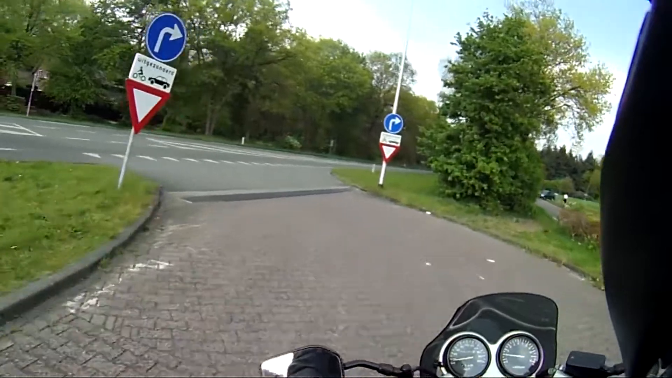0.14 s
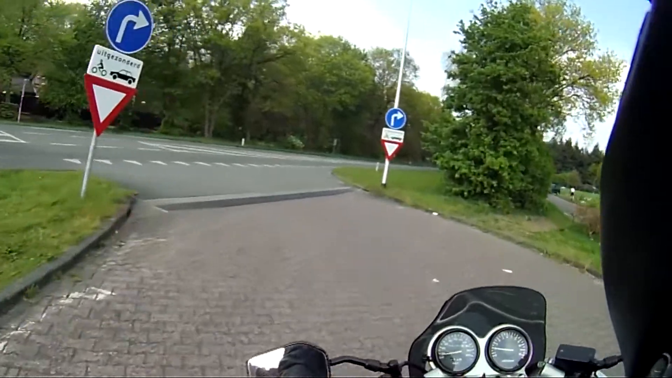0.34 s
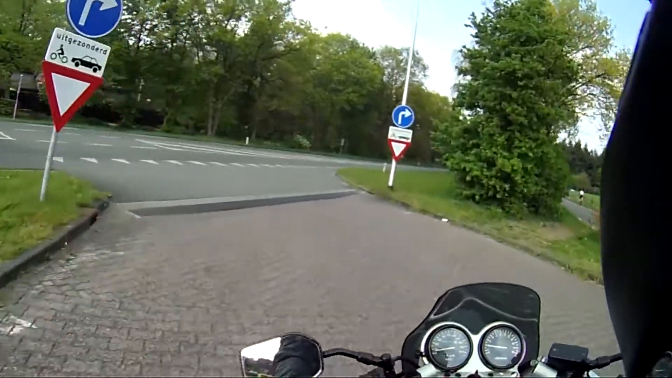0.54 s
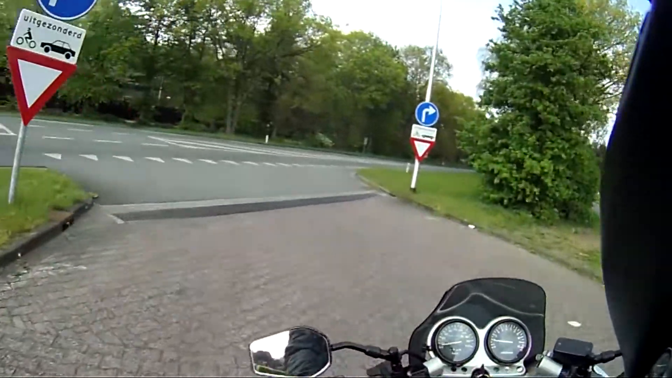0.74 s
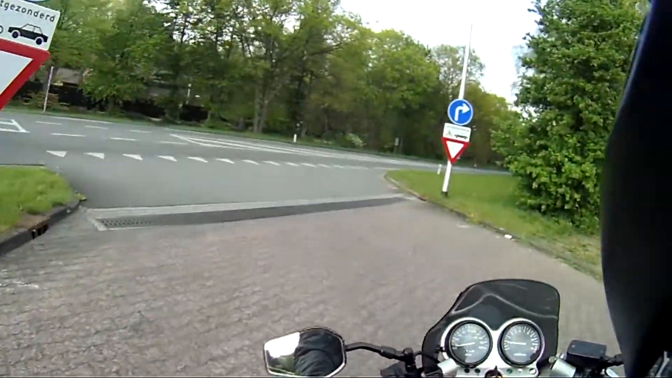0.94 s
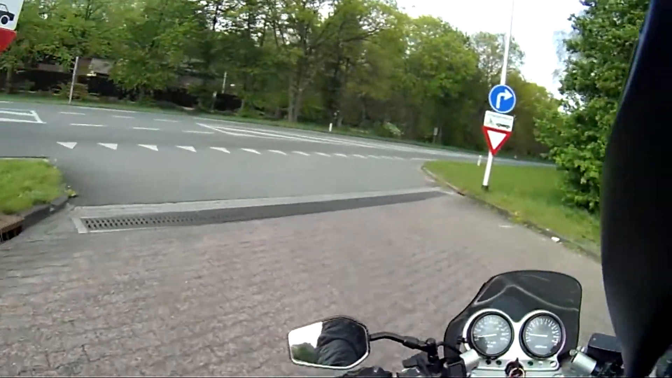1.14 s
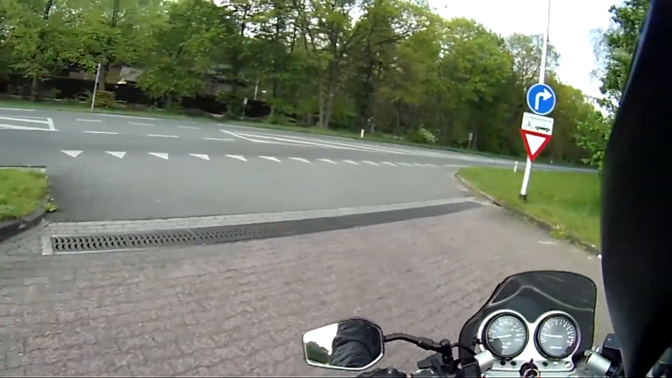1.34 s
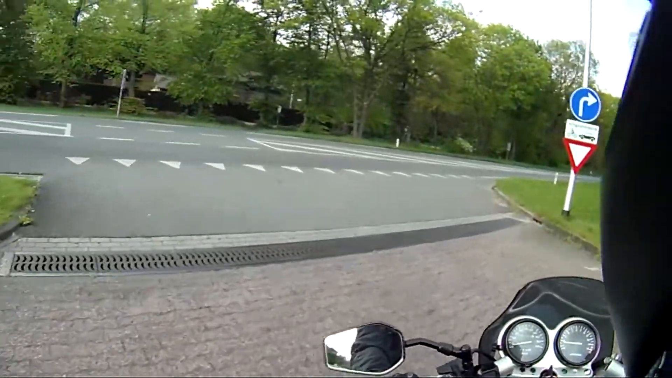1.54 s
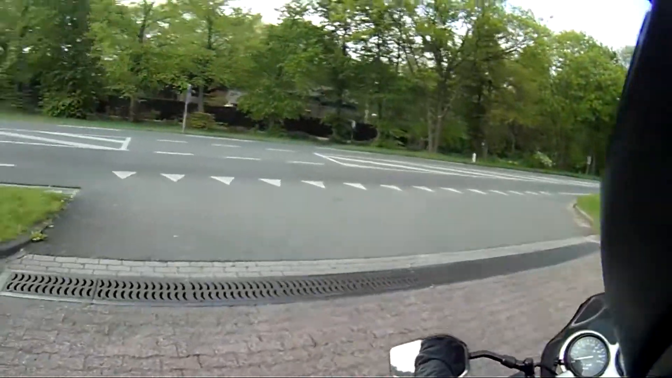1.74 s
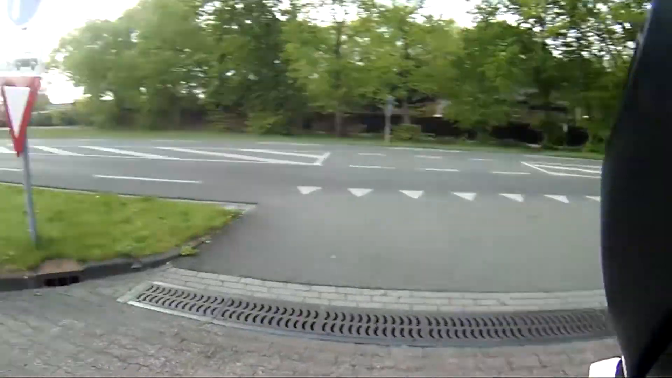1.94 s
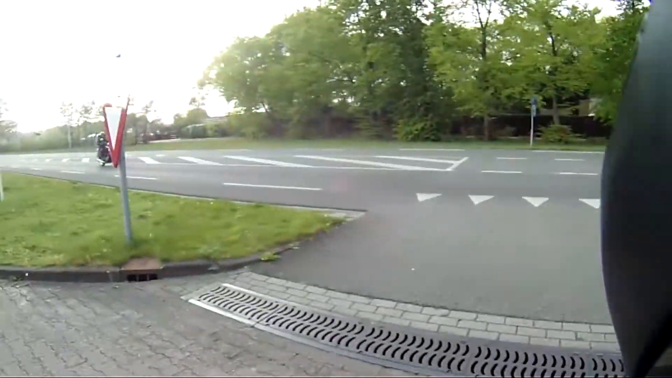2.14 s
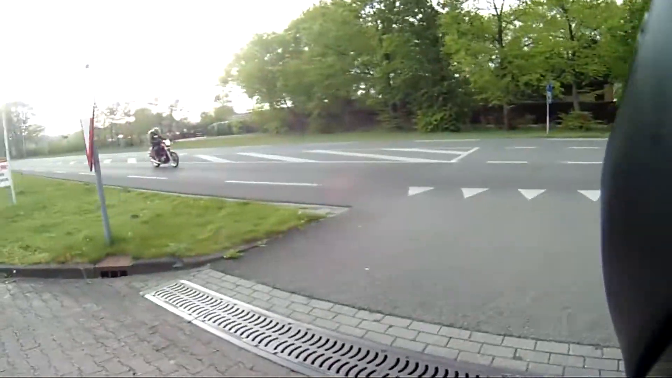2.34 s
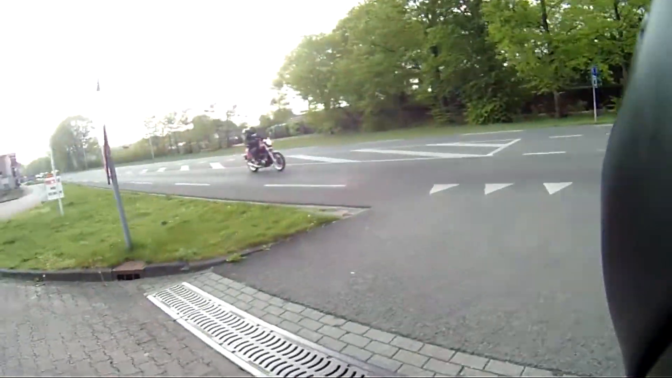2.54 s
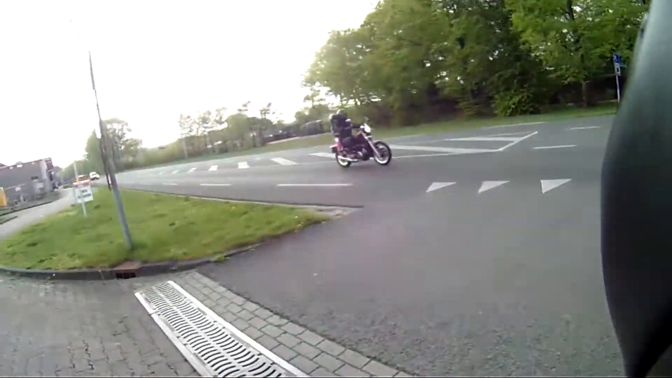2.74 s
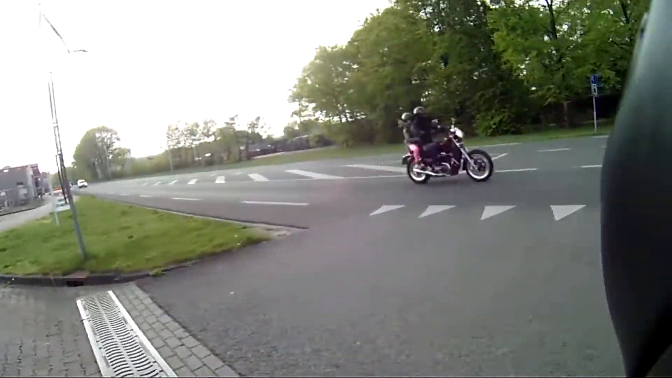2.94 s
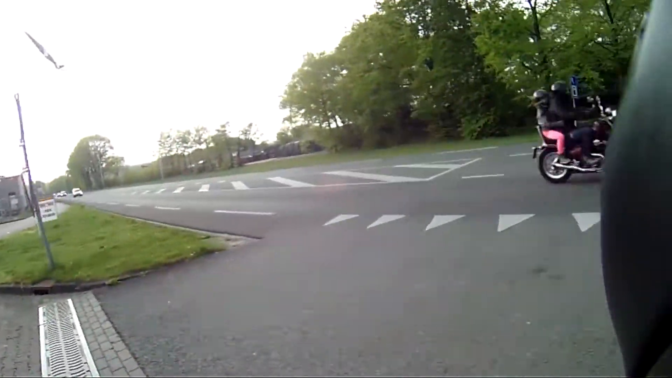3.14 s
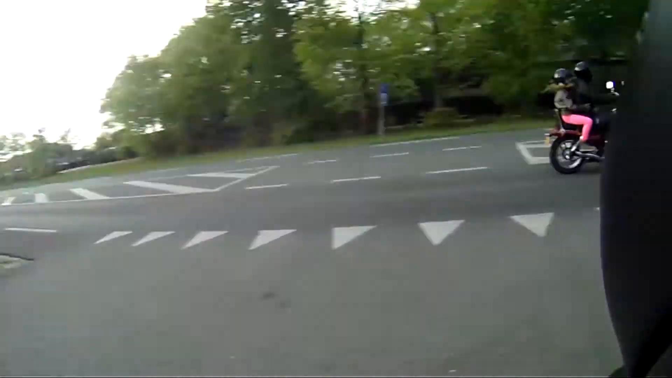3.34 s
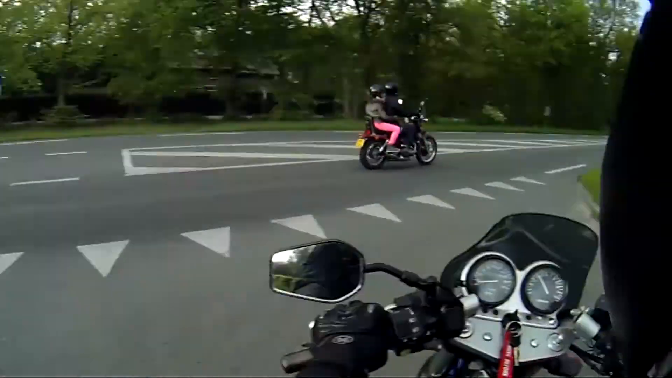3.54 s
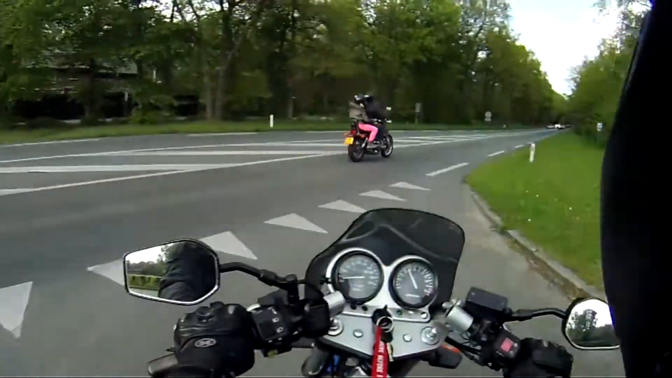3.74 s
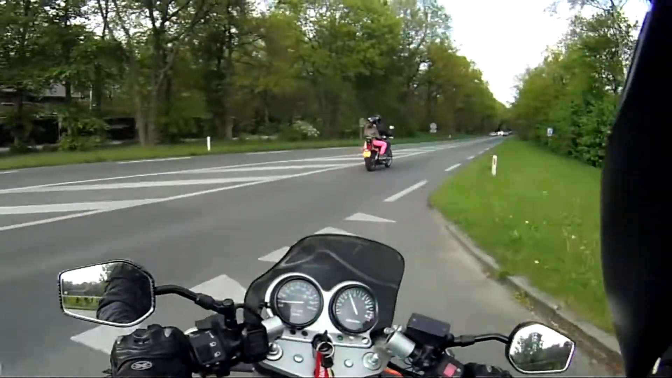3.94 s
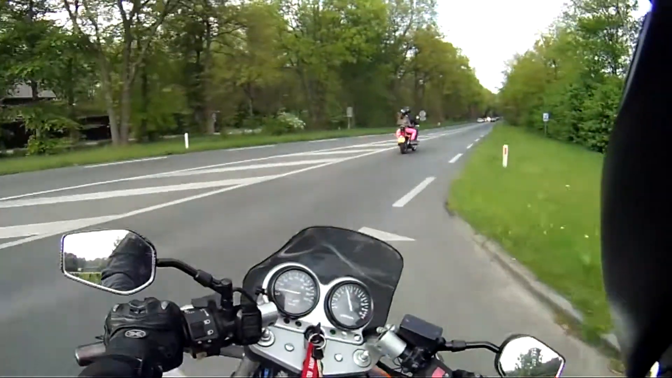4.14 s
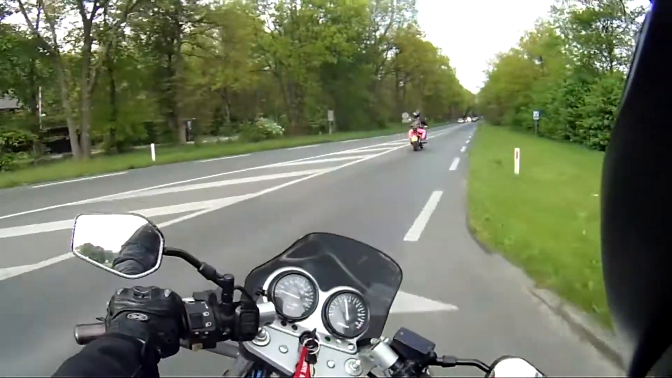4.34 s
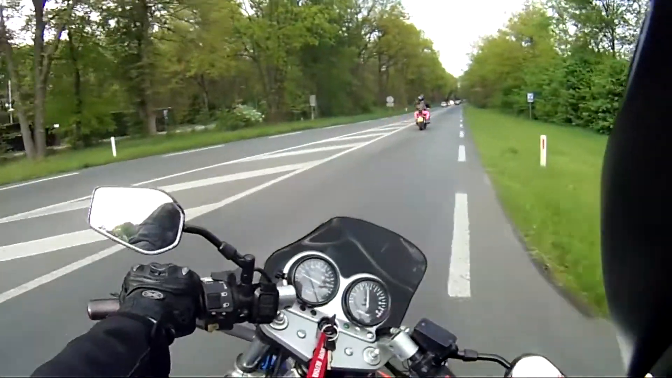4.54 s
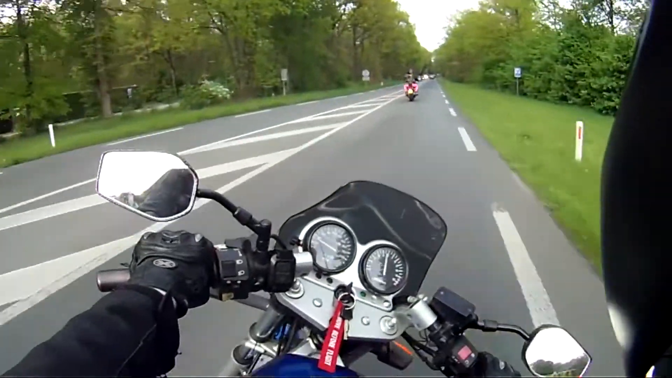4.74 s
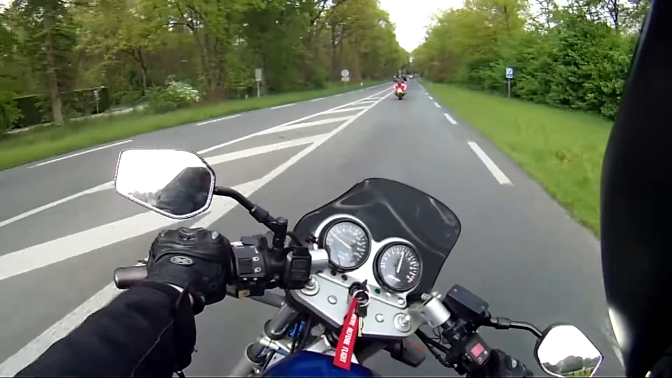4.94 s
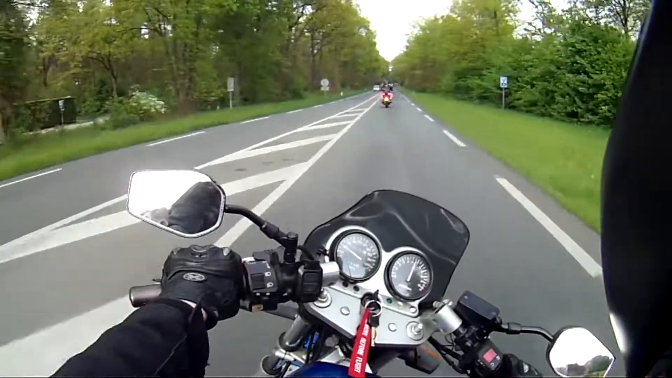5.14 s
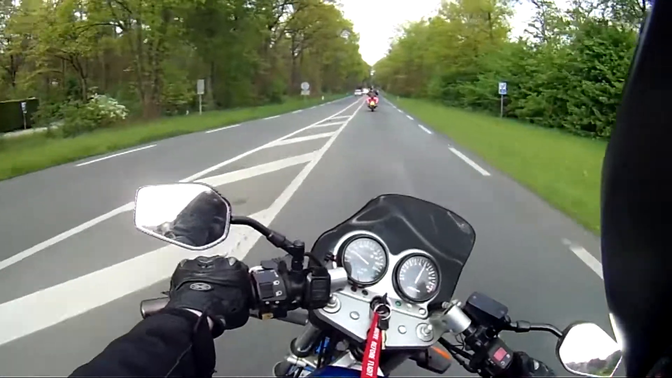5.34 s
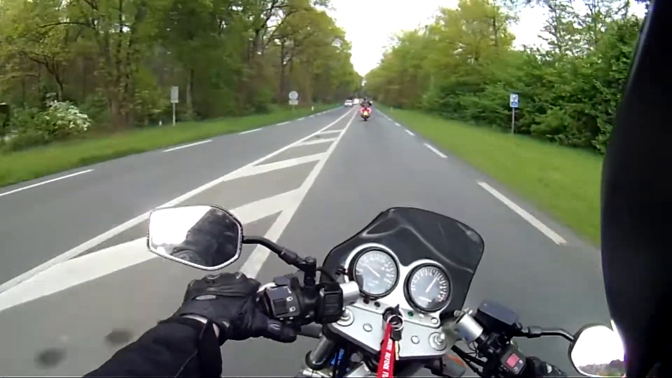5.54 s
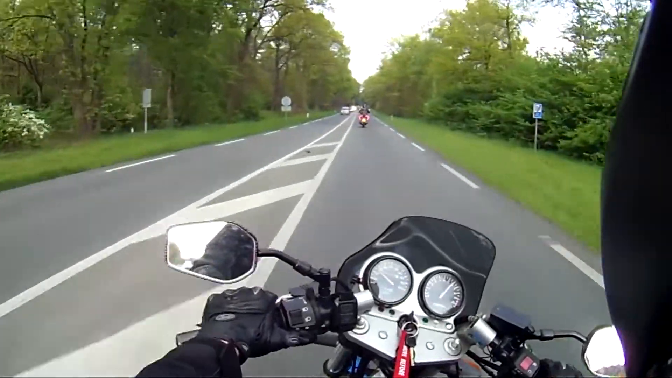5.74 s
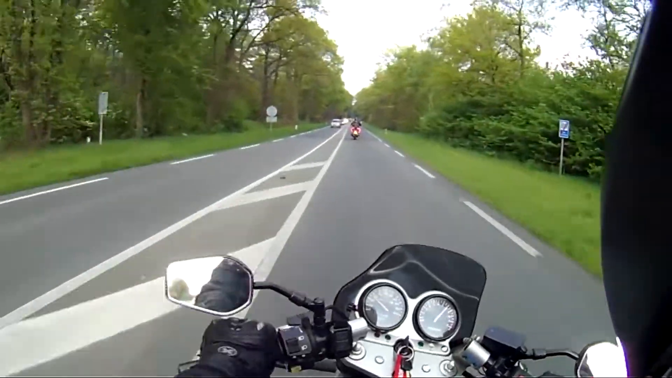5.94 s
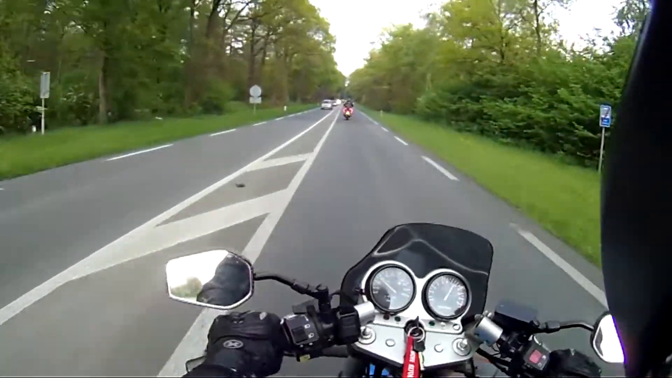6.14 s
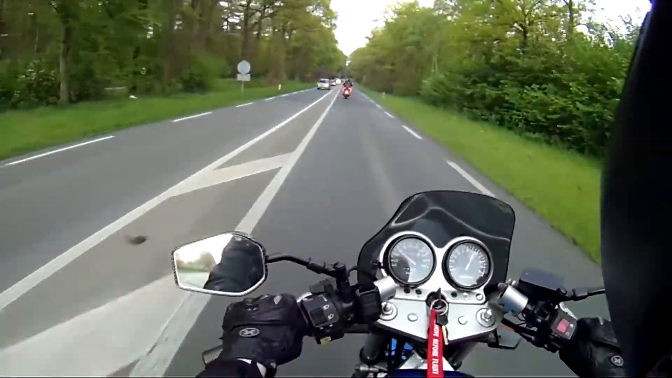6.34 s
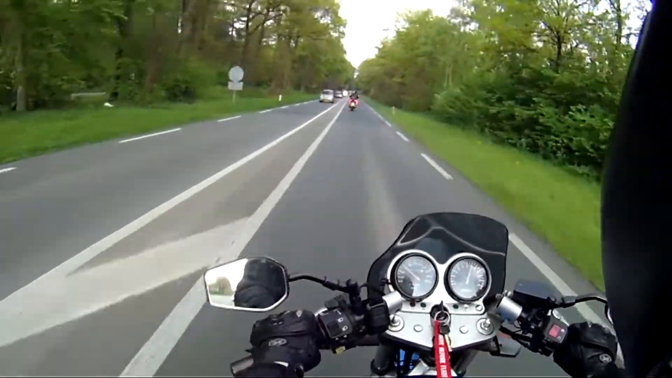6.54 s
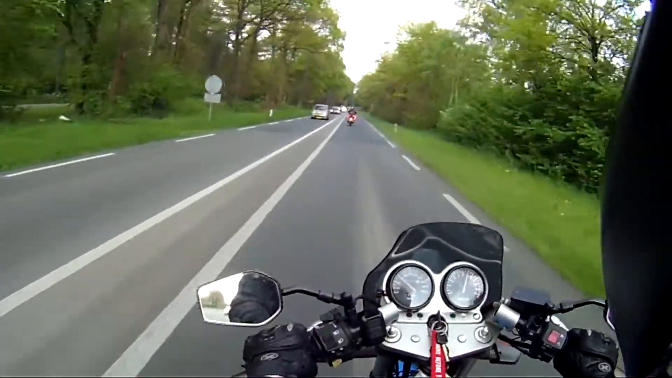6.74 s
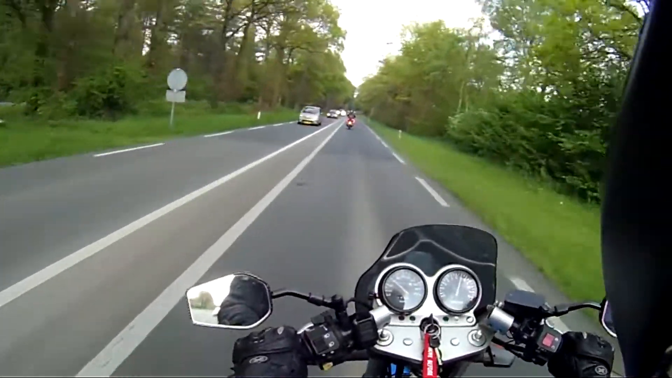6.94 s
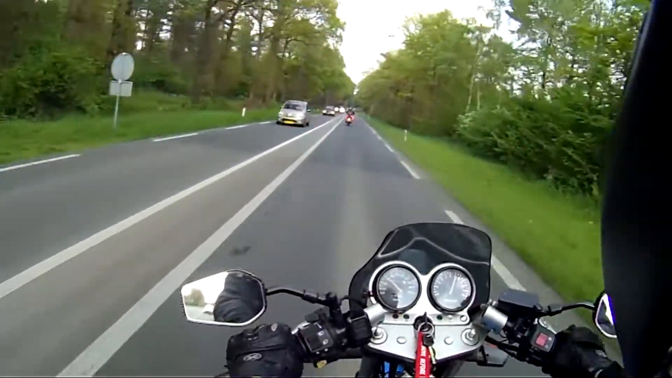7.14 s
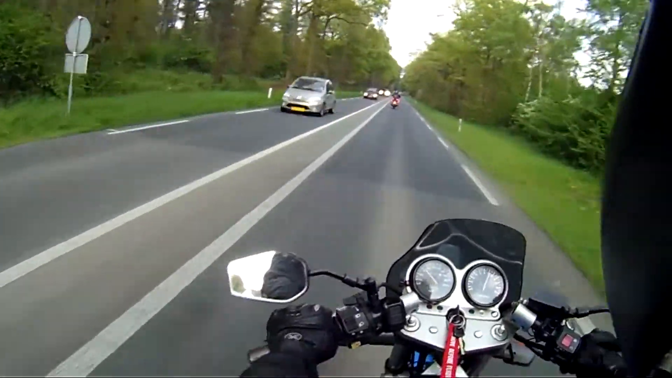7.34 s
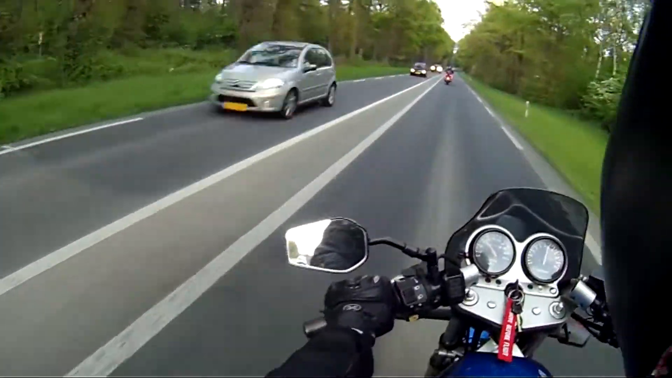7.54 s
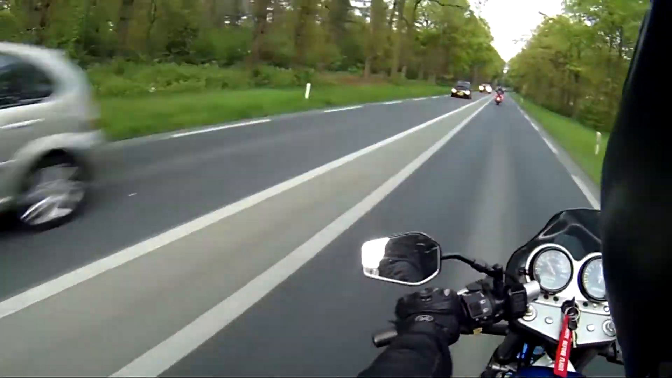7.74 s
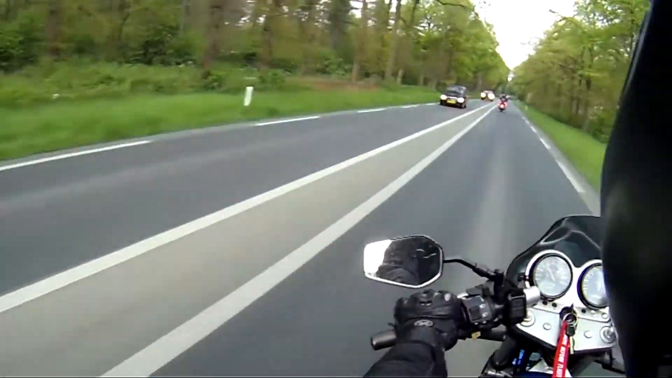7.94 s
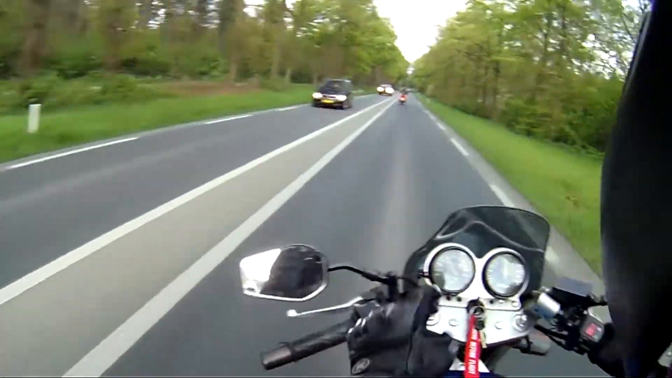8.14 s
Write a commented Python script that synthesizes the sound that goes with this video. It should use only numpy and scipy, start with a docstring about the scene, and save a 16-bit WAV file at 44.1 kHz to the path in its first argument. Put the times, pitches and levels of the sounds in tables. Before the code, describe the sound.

Heard at the rider's helmet, a twin-cylinder motorcycle idles slowly over block paving, with faint birdsong, small lever knocks and a brief collar rustle. It then accelerates onto the open road while another bike passes with a soft tyre hiss. The engine grows loud and raspy over gear whine, chain sizzle and mounting wind. The revs drop at a gear change, climb again and drop once more, and an oncoming car rushes quickly by.

```python
"""A two-cylinder motorcycle, heard from the rider's helmet, idles up to a junction and pulls away.
Its cylinders gulp air about a quarter of a cycle apart; the note hardens as the throttle opens and
turns hollow at the gear changes. Valves clatter, gears whine, the chain sizzles, levers knock, and
wind buffets the helmet as speed builds. Tyres hiss as another bike passes, and later an oncoming car.
Before the junction a bird sings faintly, the tyres rumble on paving and the helmet rubs the collar."""
import sys
import numpy as np
from scipy import signal
from scipy.fft import rfft, irfft, next_fast_len
from scipy.io import wavfile

SR = 44100
rng = np.random.default_rng(int(sys.argv[2]) if len(sys.argv) > 2 else 0)


def wrap_up_sound(samples):
    """Save the sound to the file named by the first command line argument, as 16-bit audio."""
    columns = np.atleast_2d(samples).T
    # keep every value between -1 and 1, then stretch to whole-number steps
    tamed = np.clip(columns, -1, 1)
    steps = np.round(tamed * 32767).astype(np.int16)
    wavfile.write(sys.argv[1], SR, steps)


N = 366024
TIME = np.arange(N) / SR
PULL_AWAY_S, PULL_AWAY_FADE_S = 3.055, 0.024
CRUISE_REVS, CRUISE_KMH = 50, 60

# Engine speed ("revs"). Each row: time in seconds, four-stroke cycles a second.
ENGINE_REVS = [(0.0, 13.9), (0.48, 14.22), (0.7, 12.47), (1.64, 12.08), (3.03, 10.87), (3.18, 26.78),
               (3.34, 35.86), (3.51, 38.27), (3.83, 37.71), (4.2, 38.86), (4.32, 36.64), (4.72, 45.1),
               (4.93, 49), (5.26, 54.6), (5.48, 58.4), (5.8, 63.09), (6.03, 53.1), (6.12, 49.99),
               (6.2, 55.2), (6.32, 54.9), (6.44, 47.9), (7.06, 54.4), (7.18, 55.5), (7.41, 47.08),
               (7.55, 45.6), (7.63, 43.2), (8.3, 45.49)]
# The rider's hand. Each row: time in seconds, throttle opening from 0 (shut) to 1 (wide open).
THROTTLE = [(3.05, 0.25), (3.44, 0.42), (3.9, 0.4), (4.15, 0.41), (4.32, 0.42), (4.5, 0.43), (4.7, 0.58),
            (4.92, 0.71), (5.14, 0.74), (5.5, 0.96), (5.82, 1.0), (5.87, 0), (6.12, 0.04), (6.18, 0.86),
            (6.32, 0.87), (6.43, 0.55), (6.62, 0.78), (6.8, 0.83), (7.19, 0.89), (7.27, 0.01), (7.5, 0.04),
            (7.66, 0.15), (8.3, 0.2)]
# Road speed. Each row: time in seconds, speed in km/h.
ROAD_SPEED = [(0, 21), (1, 13.1), (3.0, 11.6), (4.2, 36.7), (4.9, 47), (5.8, 61.3), (6.5, 54), (7.2, 61.8),
              (8.3, 61)]
# Five throttle openings, from shut to wide open. At each the intake pipe has its own voice.
OPENINGS = [0, 1 / 6, 1 / 3, 2 / 3, 1]
# Those voices. Each row: frequency in Hz, then a level in dB for each of the five openings.
PIPE_VOICES = [(73.4, -43.5, -31.5, -11.5, -35.5, -24.5), (103, -35, -27, -15, -18.5, -22.5),
               (138, -35, -29, -31, -17.5, -28), (200, -19, -25, -31, -16.5, -24),
               (226, -20.5, -32.5, -30.5, -27.5, -12.5), (290, -18, -24, -21, -24.5, -8.5),
               (319, -26.5, -24.5, -24, -30, -4.5), (365, -25.5, -26.5, -23, -40, -13),
               (384, -45.5, -27, -27, -23, -17.5), (454, -33, -21, -24.5, -22, -27.5),
               (502, -45, -40, -29.5, -23.5, -24.5), (570.6, -43, -35, -44.5, -22, -19),
               (659, -46.5, -48, -41, -49, -25.5), (760, -55.5, -54, -64, -57.5, -44.5),
               (940, -53.5, -59, -61.5, -48, -42), (1110, -64.5, -54.5, -68.5, -55.5, -41),
               (1330, -67, -66, -69.5, -68, -45), (1690, -55.5, -66, -62, -55, -46.5),
               (1880, -64.5, -70, -70, -66, -55.5), (2400, -78, -77, -79, -72, -66.5)]
# Standing waves in the pipe. Each row: frequency in Hz, width in Hz, boost in dB.
PIPE_RINGS = [(478.4, 8.2, 3), (730, 7.2, 5), (972, 17, -0.5)]
# The cylinder that gulps first, one row per opening. Each row: strength beside the other cylinder
# (negative flips the wave), head start in cycles.
FIRST_CYLINDER = [(0.51, 0.212), (0.44, .245), (0.66, 0.2432), (0.9, 0.2246), (-0.54, 0.2062)]
# Four valve beats a cycle lift harmonics 4, 8, 12, 16 and 20 (multiples of the revs) at high revs.
# Each row: boost in dB with the throttle shut, boost in dB under power.
VALVE_BOOST = [(-1, -1.5), (13, -1.5), (22.5, 8), (16.5, 11.5), (-4, 11)]
# The boom of the airbox, which feeds the engine air: a level in dB for each opening, at cruising revs.
BOOM_DB = [-19, -13.5, -17.5, -11, -11.5]
# One puff at idle. Each row: frequency in Hz, relative level in dB.
PUFF_TONE = [(40, 0.5), (90, 8.5), (125, -6.5), (175, -0.5), (240, 4), (330, -4.5), (430, -19.5),
             (600, -38.5), (1000, -59), (3000, -96)]
# The engine casing's tone. Each row: frequency in Hz, relative level in dB.
CASING_TONE = [(200, -16.5), (500, 7), (800, 2), (1100, 0), (1400, -8.5), (1900, -16), (2400, -24),
               (3200, -24.5), (4800, -42.5), (5800, -42), (8000, -48), (10000, -52), (14000, -74.5)]
# Where the casing rings. Each row: frequency in Hz, width in Hz, boost in dB.
CASING_RINGS = [(909, 9.7, 7.7), (1670, 63, 11), (1900, 40, 3), (2130, 56, 10), (2390, 76, 4.7),
                (4100, 150, 5.3), (4220, 110, 5.6), (4770, 550, 11), (6450, 300, 3.6), (7560, 960, 8.1)]
# Clean gear whine. Each row: harmonic number, level in dB under power.
GEAR_WHINE = [(18, -45), (25, -48), (30, -53), (36, -58)]
# The harmonic numbers at which the fastest gear teeth meet.
TOOTH_HARMONICS = [56, 110]
# The gear case's tone. Each row: frequency in Hz, relative level in dB.
GEAR_CASE_TONE = [(1500, -8), (2150, 0.5), (2650, 1.5), (3050, 0), (3400, -6.5), (3950, 0.5), (4400, -7.5),
                  (5500, -25.5), (8000, -37)]
# The chain's sizzle, which follows the pull on it. Each row: time in seconds, level in dB.
CHAIN_PULL = [(3.1, -84), (3.4, -71), (3.65, -53.5), (4.42, -53.5), (4.65, -48), (4.85, -48.5), (5.05, -51),
              (5.3, -46.5), (5.8, -44.5), (5.98, -45.5), (6.13, -53.5), (6.2, -52), (6.33, -46),
              (6.47, -57), (6.85, -54.5), (7.15, -46.5), (7.35, -52), (8.3, -53)]
# The chain on its sprockets. Each row: frequency in Hz, relative level in dB.
CHAIN_TONE = [(500, -20), (1000, 1), (1500, 12), (2200, 0.5), (2700, -0.5), (3150, -3), (3550, -12.5),
              (4000, -9.5), (4500, -8.5), (5300, -12), (5800, -18.5), (8000, -23), (10000, -34.5),
              (14000, -36)]
# Where the chain rings. Each row: frequency in Hz, width in Hz, boost in dB.
CHAIN_RINGS = [(860, 49, 9), (1710, 58, 7.9), (2510, 110, 6.3), (3840, 290, 10.5), (6360, 150, 5.4),
               (7520, 220, 9)]
# Air thumping the helmet. Each row: frequency in Hz, relative level in dB.
BUFFET_TONE = [(12, -12), (25, -2.5), (50, -6), (80, -11), (130, -15), (220, -19), (400, -31.5),
               (1000, -68.5), (3000, -101.5)]
# Air roaring over the helmet. Each row: frequency in Hz, relative level in dB.
ROAR_TONE = [(60, -2.5), (150, -5.5), (300, 2), (500, 2.5), (700, -4), (1000, -8.5), (1400, -20),
             (1800, -19.5), (2500, -36.5), (4000, -42.5), (6000, -57.5), (8000, -62), (13000, -77)]
# The other bike, then the car. Each row: time in seconds when nearest, level in dB then,
# seconds it takes to travel as far as it then is from us.
PASSES = [(3.251, -44, 0.53), (7.699, -35.5, 0.087)]
# Their tyres. Each row: frequency in Hz, relative level in dB.
TYRE_TONE = [(80, -14), (300, 8), (600, 4), (950, 3.5), (1400, -5), (1850, -7), (2200, -20.5),
             (3000, -38.5), (5000, -38.5), (9000, -53.5)]
# The helmet rubbing the collar. Each row: frequency in Hz, relative level in dB.
COLLAR_TONE = [(60, -3.5), (200, 5), (400, -6.5), (700, -18.5), (1300, -27), (2200, -34.5), (4500, -42),
               (7000, -50.5), (12000, -67)]
# Knocks from levers and gearbox. Each row: start in seconds, relative level in dB,
# fading time in seconds, relative share of metal click in dB.
KNOCKS = [(.68, -44.5, .011, -2), (.926, -42.5, .002, -20), (1.542, -42, .0022, -19),
          (1.922, -38.5, 0.0044, -23), (2.029, -36.5, 0.0047, -11), (2.576, -36, .0022, -26),
          (2.826, -34, 0.0035, 0.5), (3.227, -36.5, .0022, -4.5)]
# A knock's thud. Each row: frequency in Hz, relative level in dB.
THUD_TONE = [(100, 1), (450, 20), (900, 10.5), (1800, -9.5), (2700, -17.5), (4500, -37), (6000, -44),
             (12000, -49.5)]
# A knock's metal click. Each row: frequency in Hz, relative level in dB.
CLICK_TONE = [(500, -8), (1700, 12), (2800, -4), (4500, -17.5), (6000, -27.5), (12000, -42)]
# Where the click rings. Each row: frequency in Hz, width in Hz, boost in dB.
CLICK_RINGS = [(1750, 200, 7.5), (2600, 600, 5)]
# A small bird's notes. Each row: start in seconds, length in seconds, first and last pitch in Hz,
# relative level in dB.
BIRD_NOTES = [(.02, .08, 4200, 5150, -77), (.205, .05, 3750, 3150, -73), (.292, .045, 3700, 3150, -72),
              (.34, .035, 3000, 3800, -71), (.415, .055, 3750, 3050, -74), (.462, .04, 3050, 3800, -70),
              (.54, .05, 3850, 3100, -71), (.595, .04, 3900, 2600, -68), (.66, .045, 3900, 3200, -66),
              (.712, .041, 3700, 2950, -72), (.785, .05, 3750, 3050, -71), (.83, .035, 3000, 3750, -73.5),
              (1.22, .08, 3400, 3950, -72), (1.27, .13, 3980, 4150, -76)]
# Tyres rolling slowly over block paving. Each row: frequency in Hz, relative level in dB.
PAVING_TONE = [(25, -14.5), (60, 3.5), (110, 2), (170, -9.5), (260, -10), (450, -19), (1000, -44),
               (3000, -81.5)]
# A steady hiss. Each row: frequency in Hz, relative level in dB.
HISS_TONE = [(100, 7.5), (2500, 3), (5000, -7), (9000, -8.5), (13000, -17.5)]


def intake(cycles, revs, level_db=-2.69, lead_s=0.00543, sweep_s_per_hz=1.2e-5, sweep_top_hz=640,
           rasp_from_harmonic=15, grit_db=2):
    """Pairs of air gulps sound the intake pipe. The throttle changes its voice; the top is a rasp."""
    t = TIME[::128]  # the tone changes slowly, so coarse steps will do
    slow_revs, shares = np.interp(t, TIME, revs), voice_shares(t)
    shut = shares[0]
    first_strength, first_lead = np.transpose(FIRST_CYLINDER) @ shares
    grid_hz = np.fft.rfftfreq(8192, 1 / SR)
    voice_phases = [body_phase(voice) for voice in levels_at(PIPE_VOICES, grid_hz)]
    # with the throttle shut, the note dies away as the revs sink
    note_db = level_db + (11 * shut - 2) * octaves(np.maximum(slow_revs, 35), CRUISE_REVS)
    # a slow engine shuts its valves gently, so there is less treble
    dull_db_per_octave = 6 * np.maximum(0, 1 - slow_revs / 35)
    high_revs = np.clip((slow_revs - 46) / 8, 0, 1)
    valve_db = dict(zip((4, 8, 12, 16, 20), np.array(VALVE_BOOST) @ [shut, 1 - shut] * high_revs))
    crank = np.exp(2j * np.pi * (cycles + 1.5e-5 * revs * wander(120)))
    wave = crank
    note, rasp = np.zeros((2, N))
    for harmonic in range(2, 46):
        hz = harmonic * slow_revs
        wave = wave * crank  # steps up to this harmonic
        phase = sum(share * np.interp(hz, grid_hz, p) for share, p in zip(shares, voice_phases))
        # each gulp starts lead_s early and sweeps upward as the valve closes: its treble comes last
        swept_hz = np.minimum(hz, sweep_top_hz)
        phase += 2 * np.pi * (hz * lead_s - sweep_s_per_hz * swept_hz * (hz - swept_hz / 2))
        pair = 1 + first_strength * np.exp(2j * np.pi * harmonic * first_lead)
        pipe_db = (shares * levels_at(PIPE_VOICES, hz)).sum(0) + ring_db(PIPE_RINGS, hz)
        dull_db = dull_db_per_octave * octaves(np.maximum(hz, 55), 55)
        gain = amp(note_db + pipe_db - dull_db + valve_db.get(harmonic, 0))
        layer = note if harmonic < rasp_from_harmonic else rasp
        layer += (np.interp(TIME, t, gain * pair * np.exp(1j * phase)) * wave).real
    rasp *= amp(grit_db * np.tanh(wander(82)))
    return note * (1 + 0.02 * wander(45)) + rasp


def voice_shares(t):
    """How much of each pipe voice sounds; a snap of the throttle skips the voices in between."""
    times, opening = np.transpose(THROTTLE)
    shares = [np.interp(opening, OPENINGS, voice) for voice in np.eye(len(OPENINGS))]
    return np.array([np.interp(t, times, share) for share in shares])


def idle(cycles, revs, airbox_hz=55.8, width_hz=13.9, thump_db=-19, puff_db=-35):
    """Separate gulps of the two cylinders ring the airbox and puff through the pipe until pull-away."""
    def gulps(lead, spread_db=1):
        """One uneven kick a cycle, early by lead cycles."""
        kicks = np.diff(np.floor(cycles + lead), prepend=np.floor(lead - 1 / 8))
        return kicks * amp(spread_db * rng.standard_normal(N))
    band_hz = [airbox_hz - width_hz / 2, airbox_hz + width_hz / 2]
    airbox = signal.butter(1, band_hz, "band", fs=SR, output="sos")
    soften = signal.butter(2, [24, 135], "band", fs=SR, output="sos")
    thump = signal.sosfilt(np.r_[airbox, soften], gulps(0.04) + 0.48 * gulps(0.04 + 1 / 4))
    first_gulps = gulps(0.055 + 1 / 4, spread_db=2)
    puff = colour(gulps(0.055) + 0.38 * first_gulps, PUFF_TONE)
    puff *= amp(puff_db + 16 * octaves(np.minimum(revs, 14.5), 12))
    return swell(PULL_AWAY_S, 0, 125) * (amp(thump_db) * unit_level(thump) + puff)


def airbox_boom(cycles, revs, throttle, lowest_hz=31):
    """The airbox breathes once a cycle, a tone when fast enough; an open throttle lets it out."""
    db = np.interp(throttle, OPENINGS, BOOM_DB) + 4.5 * octaves(revs, CRUISE_REVS)
    gain = amp(db) / np.sqrt(1 + (lowest_hz / revs) ** 12)
    return gain * np.sqrt(2) * np.cos(2 * np.pi * (cycles + 0.087))


def clatter(cycles, revs, throttle, cruise_db=-40, load_db=7, load_lag_s=0.014):
    """Air tearing past the throttle and four valve taps a cycle ring the casing, more when working hard."""
    gulp = 0.18 * bumps(cycles, lead=-0.12, sharpness=2.5)
    taps = 0.35 * bumps(4 * cycles, lead=0.3, sharpness=3)
    step = 1 / (load_lag_s * SR)
    load = signal.lfilter([step], [1, step - 1], throttle)  # the load trails the throttle
    # at high revs much of the clatter repeats from cycle to cycle
    repeating = 0.69 * np.clip((revs - 15) / 40, 0, 1) * cycle_pattern(cycles)
    grains = rng.standard_normal(N) * amp(1.8 * wander(230))
    shaking = (grains + repeating) * (0.45 + gulp + taps)
    db = cruise_db + 8 * octaves(revs, CRUISE_REVS) + load_db * load
    return amp(db) * colour(shaking, CASING_TONE, CASING_RINGS)


def gears(cycles, throttle, full_sizzle_db=-66, load_db=14, spread_hz=110):
    """Gear teeth whine on a few clean harmonics; the fastest smear into a sizzle that rings the case."""
    whine = sum(amp(db + 2 * wander(8.8)) * np.cos(2 * np.pi * k * cycles) for k, db in GEAR_WHINE)
    teeth = np.zeros(N)
    for harmonic in TOOTH_HARMONICS:
        smear = wander(spread_hz) + 1j * wander(spread_hz)
        teeth += (smear * np.exp(2j * np.pi * harmonic * cycles)).real
    sizzle = amp(full_sizzle_db + load_db * (throttle - 1)) * colour(teeth, GEAR_CASE_TONE)
    return np.minimum(3 * throttle, 1) * (whine + sizzle)


def chain(cycles, tug=0.35):
    """The chain draws tight and sizzles on its sprockets, tugged by each engine cycle."""
    links = rng.standard_normal(N) + 0.1 * cycle_pattern(cycles)
    links *= 1 + tug * bumps(cycles, lead=0, sharpness=2.6)
    return amp(curve(CHAIN_PULL)) * colour(links, CHAIN_TONE, CHAIN_RINGS)


def wind(kmh, buffet_db=-19, roar_db=-28):
    """Swirls of air thump the helmet, and a roar swells with the same gusts. Both grow with speed."""
    speed_octaves, gust = octaves(kmh, CRUISE_KMH), np.tanh(wander(22))
    buffet = amp(buffet_db + 21 * speed_octaves + 2.5 * gust) * noise(BUFFET_TONE)
    roar = amp(roar_db + 15 * speed_octaves + gust + 1.2 * wander(70)) * noise(ROAR_TONE)
    return buffet + roar


def passing_traffic(fall_db_per_doubling=9):
    """Each vehicle's tyre noise swells as it comes near and fades as it leaves."""
    gain = np.zeros(N)
    for nearest_s, db, gap_s in PASSES:
        distance_doublings = octaves(np.hypot(TIME - nearest_s, gap_s), gap_s)
        gain += amp(db - fall_db_per_doubling * distance_doublings)
    return gain * amp(wander(35)) * noise(TYRE_TONE)


def collar_rustle(start_s=1.79, peak_s=2.02, peak_db=-39):
    """Cloth slips in small uneven grains as the head turns, presses harder, and stops with it."""
    cloth = colour(rng.standard_normal(N) * amp(2 * wander(90)), COLLAR_TONE)
    return amp(peak_db) * swell(start_s, 150, 0) * swell(peak_s, 14, 120) * cloth


def knocks(average_db=-61.5, relative_click_db=-15):
    """Short dead knocks: a sharp contact, then a brief rattle. Metal on metal adds a bright click."""
    thud, click = np.zeros((2, N))
    for start_s, db, decay_s, metal_db in KNOCKS:
        age_s = np.maximum(TIME - start_s, 0)
        rattle = rng.standard_normal(N) * np.exp(-age_s / decay_s) * (TIME >= start_s)
        rattle[round(start_s * SR)] += 10  # the first contact
        thud += amp(db) * rattle
        click += amp(db + metal_db) * rattle
    thud, click = colour(thud, THUD_TONE), colour(click, CLICK_TONE, CLICK_RINGS)
    return amp(average_db) * (thud + amp(relative_click_db) * click)


def bird(scatter=0.55):
    """Each note is one short glide, scattered by the leaves on its way."""
    song = np.zeros(N)
    for start_s, length_s, first_hz, last_hz, db in BIRD_NOTES:
        span = np.flatnonzero((TIME >= start_s) & (TIME < start_s + length_s))
        hz = np.linspace(first_hz, last_hz, len(span))
        song[span] += amp(db) * np.hanning(len(span)) * np.sin(2 * np.pi * np.cumsum(hz) / SR)
    return song * (1 - scatter + scatter * wander(400))


def paving_rumble(kmh, level_db=-41, asphalt_s=3.05):
    """The tyres rumble over paving blocks; the sound fades once they reach asphalt."""
    db = level_db + 6 * octaves(kmh, 10.6) + 3.3 * wander(3.7)
    return amp(db) * swell(asphalt_s, 0, 35) * noise(PAVING_TONE)


def hiss(level_db=-73):
    """A soft steady hiss lies under everything."""
    return amp(level_db) * noise(HISS_TONE)


def cycle_pattern(cycles, slack=0.0011, count=130, size=4096):
    """A random pattern that comes round every engine cycle; slack blurs its highest harmonics."""
    harmonics = np.exp(2j * np.pi * rng.random(count)) * (np.arange(count) > 1)
    position = (cycles + slack * wander(60)) % 1
    return unit_level(np.interp(position, np.arange(size) / size, irfft(harmonics, size)))


def bumps(cycles, lead, sharpness):
    """A smooth bump once a cycle, early by lead cycles."""
    return np.exp(sharpness * (np.cos(2 * np.pi * (cycles + lead)) - 1))


def swell(peak_s, rise_db_per_s, fall_db_per_s):
    """A gain that climbs to 1 at peak_s and then dies away; a rate of 0 keeps that side flat."""
    before_s, after_s = np.maximum(peak_s - TIME, 0), np.maximum(TIME - peak_s, 0)
    return amp(-rise_db_per_s * before_s - fall_db_per_s * after_s)


def wander(hz):
    """A random wobble of average level 1, moving up to about hz times a second."""
    t = TIME[::16]
    size = next_fast_len(len(t))
    keep_slow = 1 / (1 + (np.fft.rfftfreq(size, t[1]) / hz) ** 4)
    wobble = irfft(rfft(rng.standard_normal(size)) * keep_slow, size)
    return unit_level(np.interp(TIME, t, wobble[:len(t)]))


def noise(tone):
    """Steady noise with the given tone, at average level 1."""
    return colour(rng.standard_normal(N), tone)


def colour(x, tone, rings=(), size=8192):
    """Passes x through a body with a broad tone and narrow rings; comes out at average level 1."""
    hz = np.fft.rfftfreq(size, 1 / SR)
    db = levels_at(tone, hz)[0] + ring_db(rings, hz)
    tap_response = irfft(amp(db) * np.exp(1j * body_phase(db)))
    return unit_level(signal.oaconvolve(x, tap_response)[:N])


def body_phase(db):
    """How far a body with this tone shifts the wave at each frequency, in radians."""
    return -signal.hilbert(np.r_[db, db[-2:0:-1]] * np.log(10) / 20).imag[:len(db)]


def ring_db(rings, hz):
    """The boost in dB that a body's rings give at the frequencies hz."""
    return sum(boost / (1 + (2 * (hz - centre) / width) ** 2) for centre, width, boost in rings)


def levels_at(tone, hz):
    """Each dB column of a tone table at the frequencies hz."""
    table_hz, *columns = np.transpose(tone)
    return [np.interp(np.log(hz + 1), np.log(table_hz + 1), column) for column in columns]


def curve(rows):
    """Joins rows of time and value with straight lines."""
    return np.interp(TIME, *np.transpose(rows))


def octaves(value, reference):
    """How many doublings value lies above reference."""
    return np.log2(value / reference)


def amp(db):
    """Decibels to gain."""
    return 10 ** (np.asarray(db) / 20)


def unit_level(x):
    """Scales x to an average (root mean square) level of 1."""
    return x / np.sqrt(np.mean(x ** 2) + 1e-20)


def scene():
    """Revs and throttle drive the engine sounds; road speed drives the wind and the paving rumble."""
    revs, kmh = curve(ENGINE_REVS), curve(ROAD_SPEED)
    cycles = np.cumsum(revs) / SR
    under_way = np.clip((TIME - PULL_AWAY_S) / PULL_AWAY_FADE_S, 0, 1)
    throttle = under_way * curve(THROTTLE)
    bike = idle(cycles, revs) + under_way * (intake(cycles, revs) + airbox_boom(cycles, revs, throttle))
    bike += clatter(cycles, revs, throttle) + gears(cycles, throttle) + chain(cycles)
    mix = bike + wind(kmh) + passing_traffic() + collar_rustle() + knocks()
    return (mix + bird() + paving_rumble(kmh) + hiss())[None]


def record(dry, ceiling=0.72, knee=8, lowest_hz=6, highest_hz=14200):
    """Rounds off the tallest peaks, then cuts the deepest bass and the highest treble."""
    rounded = dry / (1 + abs(dry / ceiling) ** knee) ** (1 / knee)
    bass_cut = signal.butter(1, lowest_hz, "high", fs=SR, output="sos")
    treble_cut = signal.firwin(511, highest_hz, window=("kaiser", 9), fs=SR)
    return signal.oaconvolve(signal.sosfilt(bass_cut, rounded), treble_cut[None], "same")


dry = scene()
out = record(dry)
wrap_up_sound(out)
```